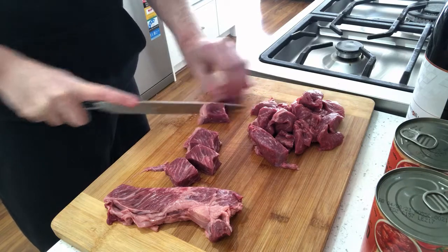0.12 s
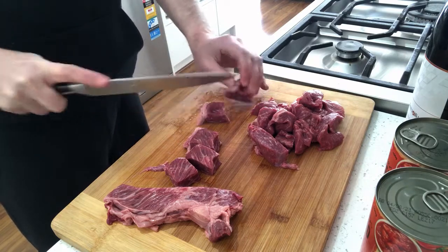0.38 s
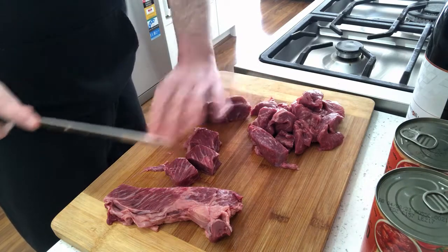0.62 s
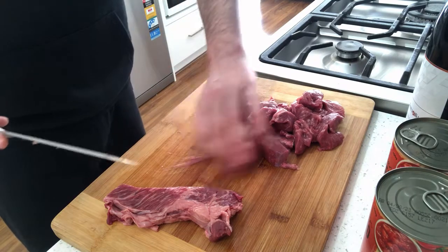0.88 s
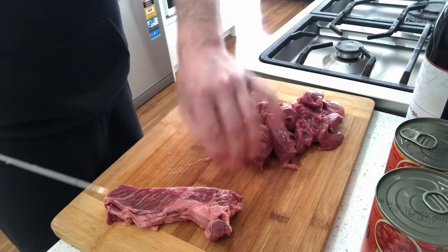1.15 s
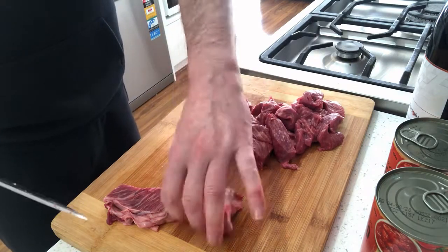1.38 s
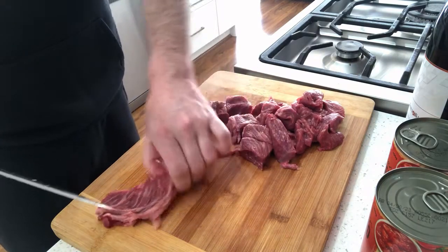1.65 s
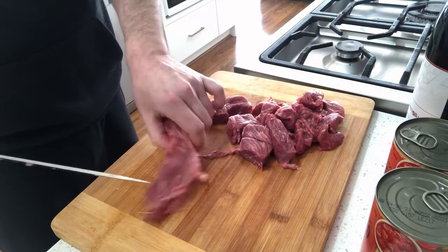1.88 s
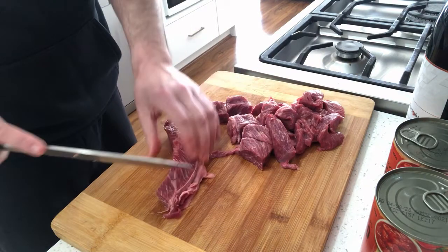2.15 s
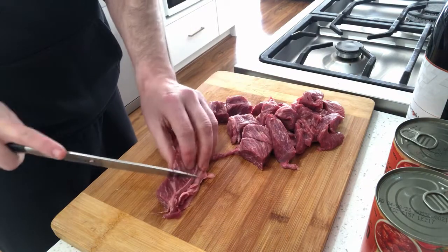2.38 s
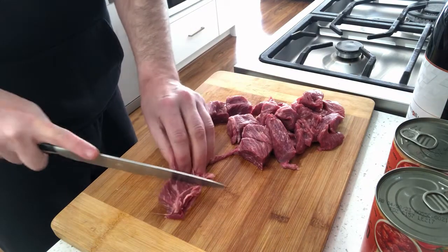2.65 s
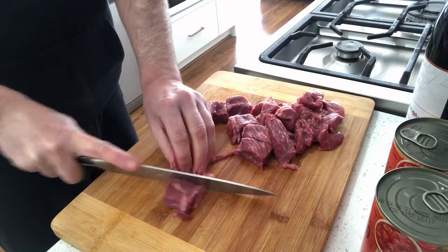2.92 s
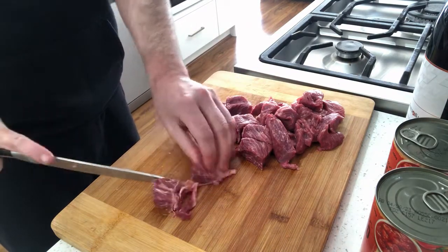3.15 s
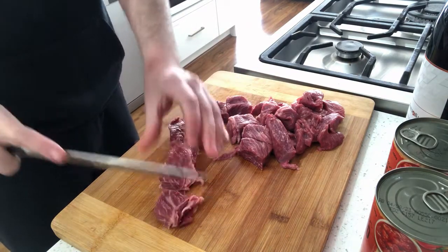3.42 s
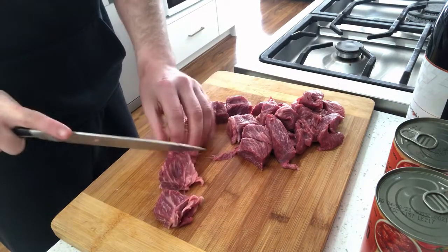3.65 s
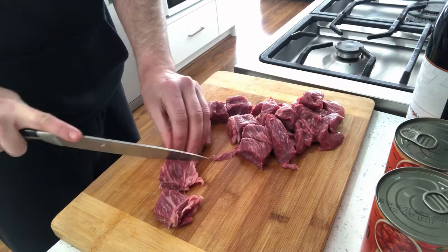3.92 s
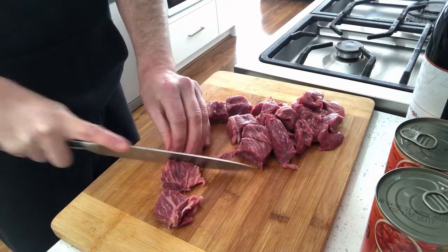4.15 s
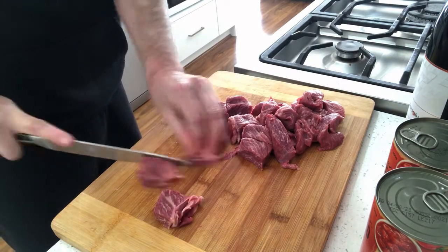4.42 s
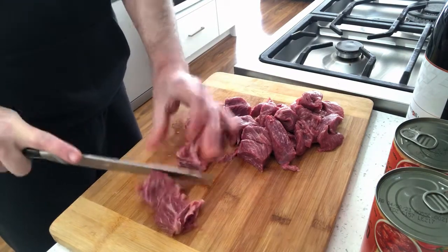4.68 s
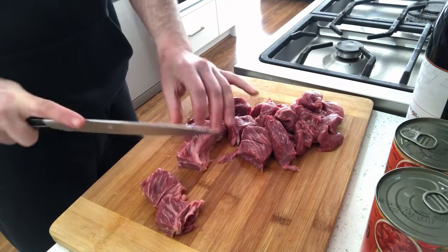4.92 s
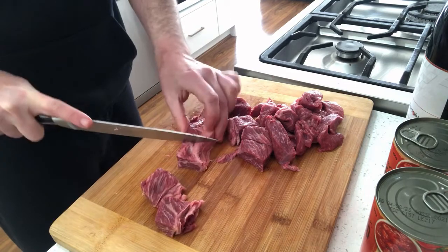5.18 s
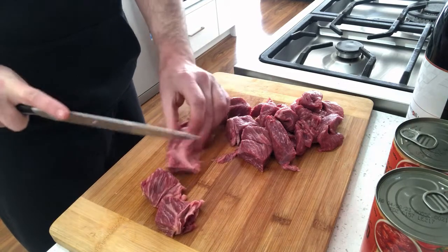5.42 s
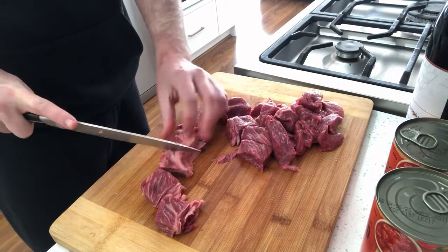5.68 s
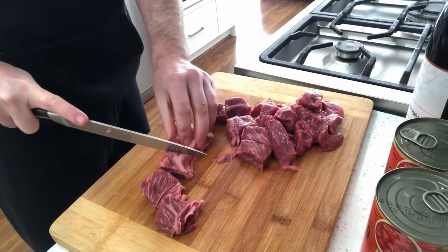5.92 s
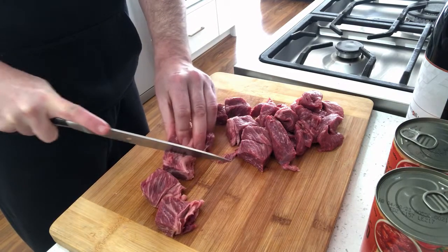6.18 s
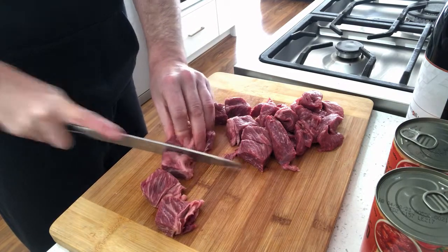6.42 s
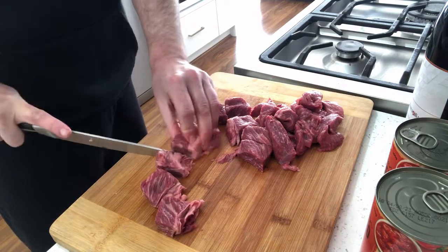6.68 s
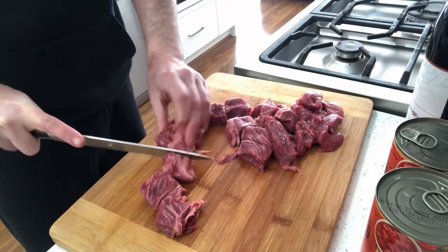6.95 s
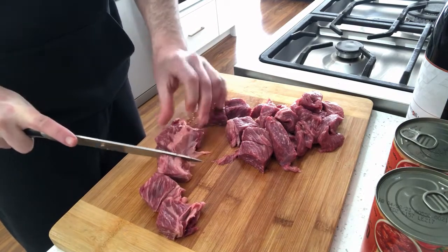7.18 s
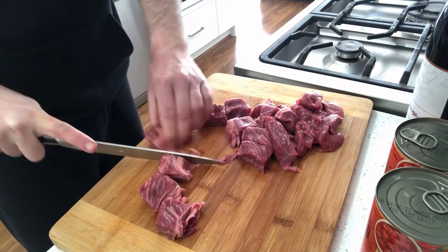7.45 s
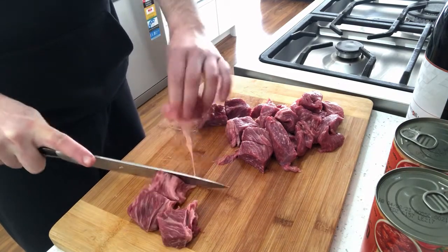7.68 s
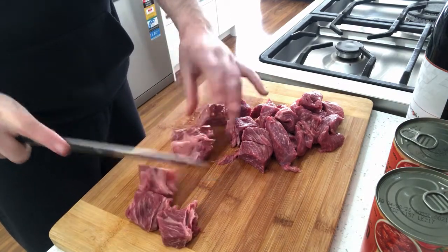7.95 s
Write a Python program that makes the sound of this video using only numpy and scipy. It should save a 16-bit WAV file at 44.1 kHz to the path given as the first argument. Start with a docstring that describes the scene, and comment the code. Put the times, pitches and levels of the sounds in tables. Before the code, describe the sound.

In a quiet kitchen, a knife draws through raw meat with short raspy scrapes over a wooden board. Soft thuds follow as meat is moved and set down, with small wet smacks throughout. A firm woody knock lands after four seconds, another after six, and the loudest, sharpest one near the end, with a brief steel scrape. Close microphone, faint hum, slight room echo.

```python
"""Slicing raw meat on a wooden board

A cook slices raw meat on a wooden board that rests on a kitchen counter, above a quiet room hum.
Knocks and soft thuds are filtered impulses that excite damped modes of board, counter and blade.
Scrapes are dense random clicks that drive the same wood and a blade resonance of moving pitch.
Wet smacks, ticks and sizzle are short or continuous bands of noise; a feedback-delay room adds its echo.
"""
import sys
import numpy as np
from scipy import signal
from scipy.fft import rfft, irfft, next_fast_len
from scipy.io import wavfile

SR = 44100
rng = np.random.default_rng(int(sys.argv[2]) if len(sys.argv) > 2 else 0)


def dump(signal):
    """Clip the signal to [-1, 1] and save it as 16-bit WAV at the path in sys.argv[1]."""
    limited = np.clip(np.atleast_2d(signal).T, -1, 1)
    pcm = np.round(limited * 32767).astype(np.int16)
    wavfile.write(sys.argv[1], SR, pcm)


def boost(x):
    """Linear amplitude factor 10**(x/20) for a level x in decibels (scalar or array-like)."""
    u = np.asarray(x, float) / 20
    return 10 ** u


N = 355882  # length [samples]


def rms_one(x):
    """Normalization: scale a signal to unit root-mean-square."""
    return x / np.sqrt(np.mean(x ** 2) + 1e-20)


def in_time(rows):
    """Linear interpolation: join the rows of a time table by straight lines."""
    s, *columns = np.transpose(rows)
    return [np.interp(np.arange(N) / SR, s, c) for c in columns]


def lowpass(x, cut_hz):
    """Second-order Butterworth low-pass filtering."""
    return signal.sosfilt(signal.butter(2, cut_hz, fs=SR, output="sos"), x)


def band(x, low_hz, high_hz):
    """Butterworth band-pass filtering between two edges."""
    edges = [low_hz, min(high_hz, 0.45 * SR)]
    return signal.sosfilt(signal.butter(2, edges, "band", fs=SR, output="sos"), x)


def drift(rate_hz):
    """Low-pass random fluctuation: noise through a double real pole, with unit rms."""
    step, settle = 20, 2000  # computed at every 20th sample, after the filter has settled
    r = np.exp(-2 * np.pi * rate_hz * step / SR)
    noise = rng.standard_normal(N // step + settle + 2)
    slow = signal.lfilter([1], [1, -2 * r, r * r], noise)[settle:]
    return np.interp(np.arange(N) / step, np.arange(len(slow)), rms_one(slow))


def ring(force, modes):
    """Modal superposition: a force drives damped sinusoids, neighbours of opposite sign."""
    out = np.zeros(len(force))
    for k, (hz, level_db, t60) in enumerate(modes):
        r = boost(-60 / (t60 * SR))
        w = 2 * np.pi * hz / SR
        mode = signal.lfilter([0, np.sin(w)], [1, -2 * r * np.cos(w), r * r], force + 1e-18)
        out += (-1) ** k * boost(level_db) * mode
    return out


def grains(per_s, spread_db):
    """Random impulse train: many small clicks and a few large ones, with unit rms."""
    sizes = boost(spread_db * np.minimum(rng.exponential(1, N), 5)) * rng.choice([-1, 1], N)
    return rms_one(sizes * (rng.random(N) < per_s / SR))


def gliding(force, hz, width_hz):
    """Heterodyne resonance of moving centre: slide down, low-pass, slide back; unit rms."""
    turn = np.exp(2j * np.pi * np.cumsum(hz) / SR)
    return rms_one((lowpass(force / turn, width_hz / 2) * turn).real)


def patchy(x, low_hz, high_hz, patchy_db):
    """Independent band modulation: as the contact wanders, each third of an octave comes and goes."""
    edges = low_hz * 2 ** np.arange(0, np.log2(high_hz / low_hz), 1 / 3)
    out = np.zeros(N)
    for k, hz in enumerate(edges):
        part = band(x, hz, hz * 2 ** (1 / 3))
        out += (-1) ** k * part * boost(patchy_db * drift(4.5))  # alternate signs let neighbours join
    return rms_one(out)


# spectrum of room hum and microphone hiss: (frequency [Hz], relative density [dB per Hz])
HUM_SPECTRUM = [(18, -43), (30, -32), (47, -9), (70, -5.5), (161, -18), (512, -22.5), (632, -26),
                (684, -24), (1160, -31.5), (1910, -34), (12300, -41.5), (16000, -47)]


def hum():
    """Spectral shaping: steady noise takes the colour of the room and wavers a little."""
    hz, level_db = np.transpose(HUM_SPECTRUM)
    bins = np.arange(N // 2 + 1) * SR / N + 1
    colour = boost(np.interp(np.log(bins), np.log(hz), level_db))
    noise = irfft(rfft(rng.standard_normal(N)) * colour, N)
    return boost(-68.5 + 1.1 * drift(1.0)) * rms_one(noise)


# blade drawn over wood and through meat, one swell per stroke:
# (start [s], length [s], wood rasp [dB], edge hiss [dB], wet sizzle [dB])
STROKES = [(-0.08, 0.3, -61, -62.5, -77), (0.154, 0.19, -63.5, -59.5, -73), (0.342, 0.08, -71, -68.5, -60),
           (0.873, 0.13, -62, -68.5, -73), (0.962, 0.15, -61.5, -63.5, -74.5), (2.79, 0.063, -63, -64, -65),
           (2.858, 0.11, -64, -65, -77), (2.995, 0.11, -61.5, -62.5, -68), (3.044, 0.14, -57.5, -56.5, -68),
           (3.115, 0.13, -60, -58, -61.5), (3.196, 0.29, -65.5, -62.5, -65.5),
           (4.322, 0.28, -56, -58, -67.5), (4.593, 0.27, -59.5, -61, -63.5),
           (4.688, 0.034, -54.5, -55.5, -60), (5.328, 0.26, -71.5, -72, -72), (5.65, 0.06, -78, -70.5, -65),
           (6.276, 0.19, -61, -65.5, -73), (6.466, 0.11, -54.5, -58.5, -69.5),
           (6.526, 0.15, -52, -58, -67.5), (6.795, 0.17, -65.5, -65.5, -67.5),
           (6.925, 0.098, -70.5, -69, -62), (6.975, 0.22, -72, -67.5, -70),
           (7.377, 0.29, -60.5, -62, -70.5)]
# blade or meat lands and slides on, sudden then dying:
# (start [s], t60 [s], wood rasp [dB], edge hiss [dB], wet sizzle [dB])
SKIDS = [(0.885, 0.68, -70.5, -68, -74), (0.994, 0.22, -56.5, -72, -85.5),
         (1.415, 0.66, -69.5, -65.5, -71.5), (1.576, 0.92, -68.5, -66.5, -71.5),
         (3.366, 0.12, -50.5, -50, -53), (4.212, 1.03, -60, -63, -68), (6.403, 0.27, -55, -84.5, -87),
         (7.362, 2.1, -65, -71, -87), (7.661, 0.28, -46.5, -47, -56)]
# fingers working the meat, a faint rustle: (time [s], level [dB])
HANDLING = [(0.0, -81), (0.7, -88.5), (1.15, -82), (1.4, -80.5), (1.9, -77.5), (2.5, -87), (2.77, -71),
            (3.5, -75), (3.75, -94), (4.15, -75.5), (4.9, -88), (5.35, -82), (5.7, -100.5), (6.2, -82),
            (6.72, -74.5), (7.25, -81.5), (7.8, -71), (8.07, -81.5)]


def rubbing():
    """Addition of powers: arched strokes and decaying skids add to the rustle of the fingers."""
    t = np.arange(N) / SR
    rustle_db, = in_time(HANDLING)
    offsets_db = np.array([[-3.5], [0], [-6]])  # wood rasp, edge hiss, wet sizzle
    power = boost(rustle_db + offsets_db) ** 2
    for start, length, *levels_db in STROKES:
        arch = np.sin(np.pi * np.clip((t - start) / length, 0, 1)) ** 2.04  # larger is more pointed
        power = power + (boost(levels_db)[:, None] * arch) ** 2
    for start, t60, *levels_db in SKIDS:
        age = np.maximum(t - start, 0)
        slide = np.minimum(age / 0.0057, 1) * boost(-60 * age / t60)  # rise time [s], then decay
        power = power + (boost(levels_db)[:, None] * slide) ** 2
    return np.sqrt(power)


# modes of the wooden board: (frequency [Hz], relative level [dB], free t60 [s])
BOARD = [(601, -8.5, 0.078), (786, -13.5, 0.018), (860, -17.5, 0.11), (980, -10, 0.031),
         (1211, -3.5, 0.035), (1347, -10.5, 0.097), (1677, -5.5, 0.1), (1678, 14, 0.011),
         (1942, 0.5, 0.033), (2106, 0, 0.014), (2490, -6, 0.055), (3310, -7, 0.045), (3940, 9.5, 0.016)]


def wood_rasp(catch, hard, hollow_db, wood_hz):
    """Modal excitation by friction: catching fibres shake the board and the wood under the edge."""
    ringing = [mode for mode in BOARD if mode[2] > 0.014]
    wood = rms_one(ring(catch, ringing)) + boost(-4.5) * rms_one(band(catch, 430, 4050))
    wood = patchy(wood, 488, 2800, patchy_db=1.8)
    low = signal.sosfiltfilt(signal.butter(2, 1400, fs=SR, output="sos"), wood)
    under_edge = hard * gliding(catch, wood_hz, 510)
    return wood + (boost(hollow_db) - 1) * low + boost(-2) * under_edge


# slow bending of the board on the counter: (frequency [Hz], relative level [dB], t60 [s])
COUNTER = [(65.2, -15.5, 0.24), (79.7, -5.5, 0.039), (127.5, -7, 0.072), (176.1, -12, 0.13),
           (274, -5, 0.031), (305.3, -9, 0.066), (426.2, -22, 0.17)]


def counter_bend(catch):
    """Flexural resonance: the same catches make the board bend on the counter."""
    return boost(-5.5) * rms_one(band(ring(catch, COUNTER), 140, 727.8))


# partials of the free length of blade: (multiple of its lowest pitch, relative level [dB])
BLADE_OVERTONES = [(1, -0.5), (1.43, -3.5)]


def singing_steel(catch, blade_hz):
    """Length-dependent resonance: blade free of meat sings at a pitch that moves with the contact."""
    steel = np.zeros(N)
    for multiple, level_db in BLADE_OVERTONES:
        swell = boost(level_db - 11.5 + 8.6 * drift(5.8))
        steel += swell * gliding(catch, multiple * blade_hz, 220)
    return steel


def juice():
    """Noise modulation: a fine spray is roughened by liquid films that pop one by one."""
    spray = rng.standard_normal(N)
    pops = signal.lfilter([1], [1, -boost(-60 / (0.0064 * SR))], np.abs(grains(70, spread_db=2.0)))
    return rms_one(band(spray * (1 + boost(-4) * rms_one(pops)), 8200, 21000))


def ticks(sizzle):
    """Random film rupture: tiny films pop more often where there is juice on the move."""
    often = np.clip((sizzle / boost(-78)) ** 2, 0, 1)
    sizes = boost(5.3 * np.minimum(rng.exponential(1, N), 3))
    sizes = sizes * (rng.random(N) < 22 * often / SR)  # at most 22 per second on average
    burst = signal.lfilter([1], [1, -boost(-60 / (0.0037 * SR))], sizes + 1e-18)
    return boost(-66) * burst * rms_one(band(rng.standard_normal(N), 5500, 20000))


# where the edge bites, as it travels:
# (time [s], gain of hollow low modes [dB], wood under the edge [Hz], free length of blade [Hz])
CONTACT = [(0.0, 11, 1170, 3340), (0.2, 8, 1190, 3200), (0.28, 8, 1330, 3300), (0.95, 4.5, 1480, 3070),
           (3.03, 2.5, 1520, 2500), (3.13, 4, 1480, 2730), (3.16, -1.5, 1300, 3440), (3.3, 8.5, 1420, 3400),
           (4.38, -1, 1420, 2950), (4.52, 1.5, 1640, 3570), (4.71, -1, 1610, 3290), (6.49, 0, 1540, 3100),
           (6.61, -2, 1650, 3790), (7.45, 10.5, 1590, 3100)]


def scrape():
    """Friction: the edge catches wood fibres thousands of times a second, shaking board and blade."""
    rasp, hiss, sizzle = rubbing()
    hollow_db, wood_hz, blade_hz = in_time(CONTACT)
    catch = grains(6000, spread_db=3.1) * boost(1.2 * drift(60))
    hard = np.minimum(hiss / boost(-60), 1) ** 2  # only firm rubbing makes the contact sing
    wood = wood_rasp(catch, hard, hollow_db, wood_hz) + counter_bend(catch)
    edge = patchy(band(catch, 1660, 5700), 2930, 8000, patchy_db=2.0)
    edge = edge + hard * singing_steel(catch, blade_hz)
    return rasp * wood + hiss * edge + sizzle * juice() + ticks(sizzle)


# hands and knife pushing the board about: (time [s], rumble level [dB])
SHOVE = [(0.0, -56), (0.36, -73), (2.6, -71), (2.8, -62), (3.0, -66.5), (3.89, -77), (4.1, -73),
         (4.2, -63.5), (4.43, -62), (4.9, -74), (6.02, -76), (6.25, -76), (6.36, -57), (6.5, -67.5),
         (8.07, -75)]


def shove():
    """Forced low-frequency vibration: lumpy pushes shake the counter and a low band of the board."""
    push_db, = in_time(SHOVE)
    lumps = rng.standard_normal(N) * boost(2.5 * drift(35))
    rumble = rms_one(ring(lumps, COUNTER)) + boost(-6) * rms_one(band(lumps, 130, 640))
    return boost(push_db) * rms_one(rumble)


# modes of the blade: (frequency [Hz], relative level rubbed near the tip [dB],
# relative level rubbed near the heel [dB], t60 [s])
BLADE = [(3100, -11, -20, 0.23), (3300, -17, 2.5, 0.026), (3580, -22, -8, 0.19), (4174, 1, 3, 0.06),
         (4800, -2, 1.5, 0.068), (5500, -13, -25, 0.19), (5880, -25, 1, 0.069), (7200, -4, -18, 0.12),
         (8700, -29, -4.5, 0.035), (8750, -9, -12, 0.083), (10480, -19, -5, 0.044), (12000, -27, -1, 0.033),
         (14870, -7.5, -26, .03)]


def blade_at(place):
    """Position-dependent mode excitation: blend the levels from tip (0) to heel (1)."""
    place = np.clip(place, 0, 1)
    return [(hz, tip_db + place * (heel_db - tip_db), t60) for hz, tip_db, heel_db, t60 in BLADE]


# meat or hand landing softly: (time [s], peak level [dB],
# hardness [octaves above 100 Hz], weight on the counter [dB])
THUDS = [(0.005, -43, 3.9, 6), (0.815, -43.5, 0.12, 19), (1.408, -33, 0.12, 4), (2.042, -43, 1.5, 8),
         (2.769, -46, 0.65, -1), (2.816, -39.5, 0.81, 4), (2.929, -47, 0.35, 4), (3.242, -44.5, 0.15, -3),
         (4.153, -51.5, 1.3, 6), (4.217, -38.5, 1.1, 2), (4.259, -38.5, 0.72, 16), (6.32, -46.5, 1.7, 15),
         (6.35, -41, 1.1, 14), (6.68, -50, 0.14, -6), (7.953, -47, 1.4, 6.5)]
# edge meeting the board: (time [s], peak level before the blade ring is added [dB],
# hardness [octaves above 100 Hz, cutoff held to 9 kHz], weight on the counter [dB],
# gain of hollow low modes [dB], gain of solid middle modes [dB])
KNOCKS = [(1.038, -45, 3.6, 13.5, 10.5, -10), (2.915, -45.5, 2.55, 0, 4, 0),
          (3.372, -35.5, 4.3, -7, -14, 9), (4.212, -42.5, 6.2, 9, 1, 8.5), (4.289, -23, 3.84, 1.5, 6.5, 3),
          (4.376, -42, 4.9, -11, 0, 0), (6.333, -40.5, 2.9, 22, -14, 8), (6.4014, -26, 3.77, 6, 9.5, -10),
          (7.3612, -11, 4.5, 0.5, -2.5, 2), (7.665, -34, 7.1, -12, -15.5, 7)]


def blows():
    """Impact bandwidth: soft contact is a dull push, hard a sharp click; slow bending answers late."""
    out, length = np.zeros(N + SR), SR // 2
    age = np.arange(length) / SR
    click = np.eye(1, length)[0]
    crack = rng.standard_normal(length) * (boost(-60 * age / 0.008) + boost(-20 - 60 * age / 0.07))
    for s, peak_db, hardness, weight_db, *place_db in KNOCKS + THUDS:
        cut_hz = np.clip(100 * 2 ** hardness, 40, 9000)
        push = lowpass(click, cut_hz)
        late = np.concatenate([np.zeros(round(0.00398 * SR)), push])[:length]
        hollow_db, solid_db = place_db or (0, 0)
        board = []
        for hz, level_db, t60 in BOARD:
            place_gain_db = hollow_db if hz < 1120 else solid_db * (hz < 1950)
            board.append((hz, level_db + place_gain_db, t60 * 0.83))  # contact shortens the ring
        hit = ring(push, board) + boost(weight_db) * ring(late, COUNTER)
        hit = hit + boost(14) * lowpass(crack, cut_hz)
        hit = hit / np.abs(hit).max()
        if place_db:  # only the steel edge makes the blade ring
            hit = hit + boost(-38) * ring(click, blade_at(0.43))
        i = round(s * SR)
        out[i:i + length] += boost(peak_db) * hit
    return out[:N]


# wet meat letting go of fingers, steel or wood: (time [s], peak level [dB], centre [Hz])
SMACKS = [(0.172, -50.5, 4830), (0.374, -43.5, 7120), (0.916, -44.5, 5330), (1.0518, -41.5, 4850),
          (1.1678, -49, 8300), (1.426, -44, 4260), (1.4822, -47, 3940), (1.54, -50, 6900),
          (1.9, -41.5, 7900), (2.0444, -49, 2790), (2.577, -51, 3940), (2.6861, -42.5, 6500),
          (2.9997, -51, 12500), (3.014, -42, 5300), (3.1618, -46, 9200), (3.438, -47, 7500),
          (4.019, -48.5, 11600), (4.214, -40.5, 4750), (4.378, -45, 3520), (4.421, -43, 5270),
          (4.733, -45, 9300), (4.79, -46, 7000), (5.405, -48.5, 4070), (5.4275, -38, 3530),
          (5.4362, -46, 5370), (5.4766, -45.5, 12600), (5.67, -50, 12000), (5.965, -52, 9200),
          (6.594, -42.5, 9900), (6.786, -48.5, 4140), (6.7958, -45.5, 4950), (6.9587, -43, 9600),
          (7.1105, -45.5, 9400), (7.979, -48, 4500)]


def smacks():
    """Film rupture: a wet film snaps as a broad burst of a few milliseconds."""
    length = 400
    out, age = np.zeros(N + length), np.arange(length) / SR
    decay = boost(-60 * age / 0.0039) + boost(-11 - 60 * age / 0.046)
    for s, peak_db, hz in SMACKS:
        snap = rng.standard_normal(length) * decay
        burst = band(snap, hz / 2.08, hz * 1.23) + boost(-18) * band(snap, 1400, 13000)
        i = round(s * SR)
        out[i:i + length] += boost(peak_db) * burst / np.abs(burst).max()
    return out[:N]


# bare steel grazes the wood and sings:
# (start [s], length of touch [s], rms level during touch [dB], place [0 tip to 1 heel])
GRAZES = [(3.35, 0.04, -54, 0.055), (7.658, 0.021, -48, 1), (7.689, 0.043, -60, 0.68)]


def grazes():
    """Free vibration: brief catches drive blade and board (more at the heel); ring outlasts touch."""
    out, length = np.zeros(N + SR), SR // 2
    ringing = [mode for mode in BOARD if mode[2] > 0.03]
    for s, touch_s, level_db, place in GRAZES:
        catch = rng.standard_normal(length) ** 3  # cubing makes a few catches stand out
        touch = np.sin(np.pi * np.clip(np.arange(length) / SR / touch_s, 0, 1) ** 1.17)
        force = catch * touch
        sing = ring(force, blade_at(place)) + boost(10 - 20 * (2 - place)) * ring(force, ringing)
        i = round(s * SR)
        out[i:i + length] += boost(level_db) * sing / np.std(sing[:round(touch_s * SR)])
    return out[:N]


# all-pass delays that smear the echo: (delay [s], ...)
SCATTER_S = (0.0013, 0.0031, 0.0053)


def kitchen(x):
    """Reverberation: ten feedback delays, duller each round, are smeared by shelves and tiles."""
    room_t60_s, wall_cut_hz = 0.64, 3200  # the wall filter shortens the treble further
    size = next_fast_len(N + SR)
    hz = np.arange(size // 2 + 1) * SR / size
    wall = 1 / (1 + 1j * hz / wall_cut_hz)
    tail = 0
    for k, lag in enumerate(rng.uniform(0.0089, 0.04, 10)):
        trip = boost(-60 * lag / room_t60_s) * wall * np.exp(-2j * np.pi * hz * lag)
        tail = tail + (-1) ** k * trip / (1 - trip)
    for lag in SCATTER_S:
        turn = np.exp(-2j * np.pi * hz * lag)
        tail = tail * (turn - 0.6) / (1 - 0.6 * turn)
    return irfft(rfft(x, size) * tail, size)[:N]


def scene():
    """Superposition: everything on the board, its echo in the kitchen, and the hum."""
    near = scrape() + shove() + blows() + smacks() + grazes()
    return (hum() + near + boost(-24) * kitchen(near))[None]


def low_pass(x):
    """Removes everything above the highest recorded frequency."""
    return signal.sosfilt(signal.butter(12, 16470, fs=SR, output="sos"), x)


def record(dry):
    """Band limitation: the microphone drops the deepest bass and the very top."""
    cut = signal.sosfilt(signal.butter(3, 45, "high", fs=SR, output="sos"), dry)
    cut = signal.sosfilt(signal.cheby2(10, 40, 16600, fs=SR, output="sos"), cut)
    return low_pass(cut)


dry = scene()
out = record(dry)
dump(out)
```